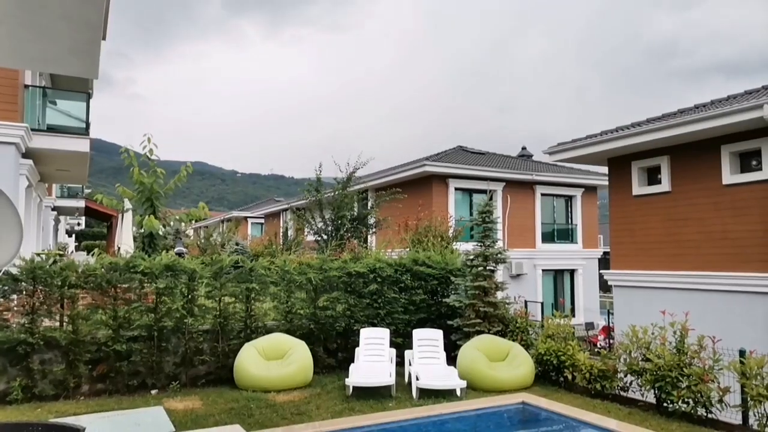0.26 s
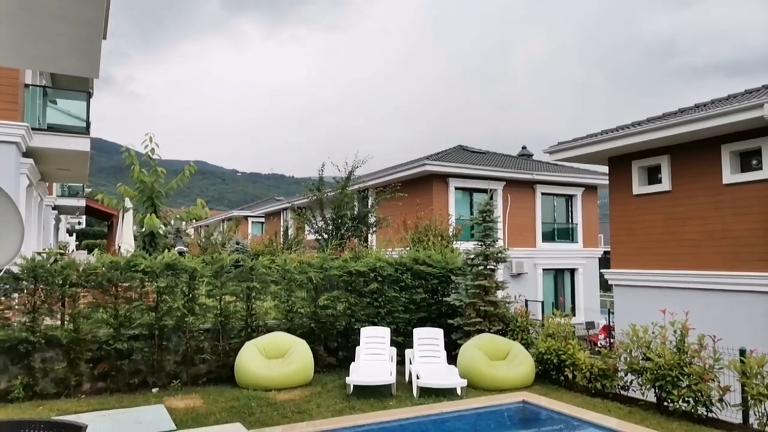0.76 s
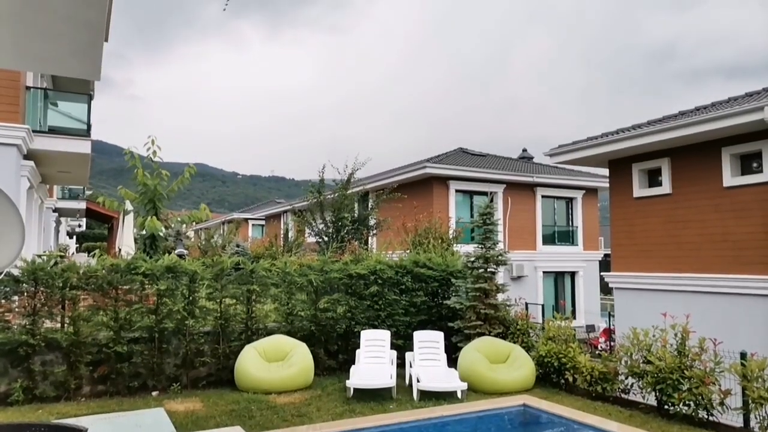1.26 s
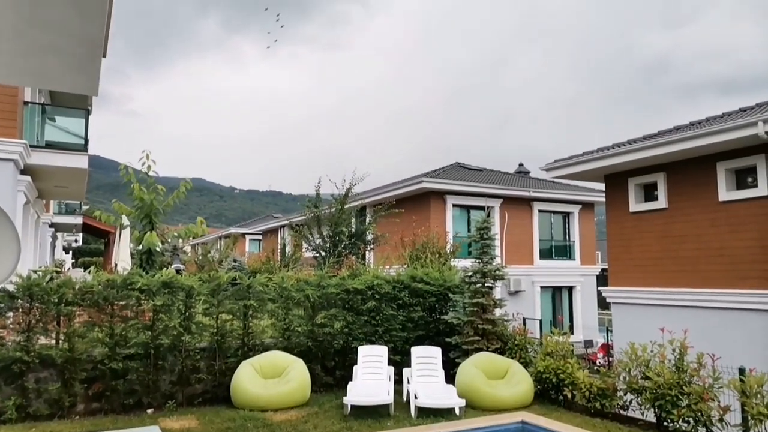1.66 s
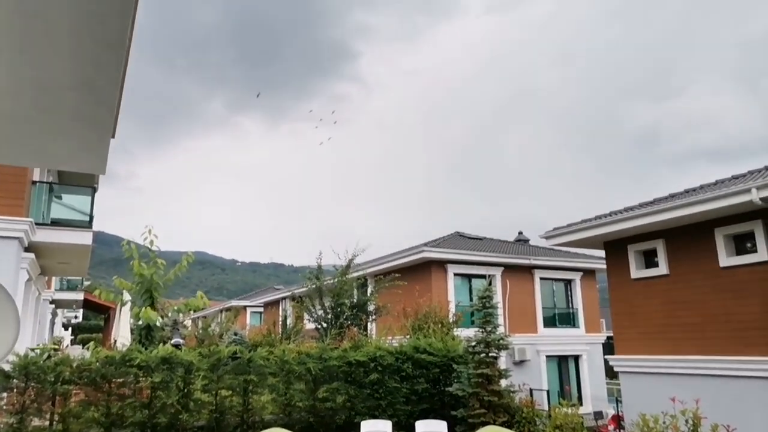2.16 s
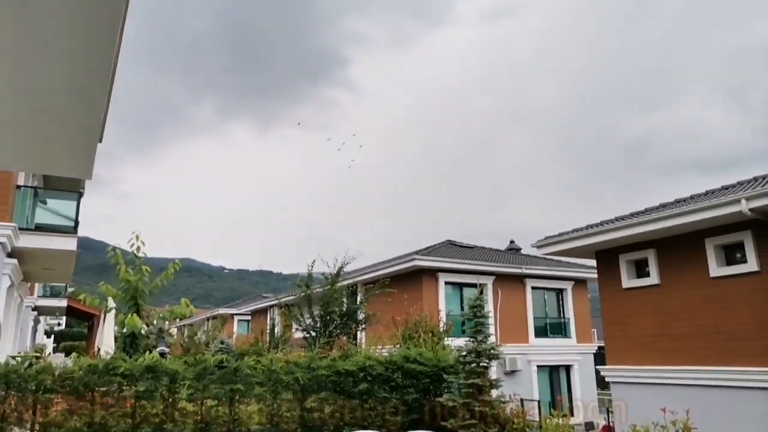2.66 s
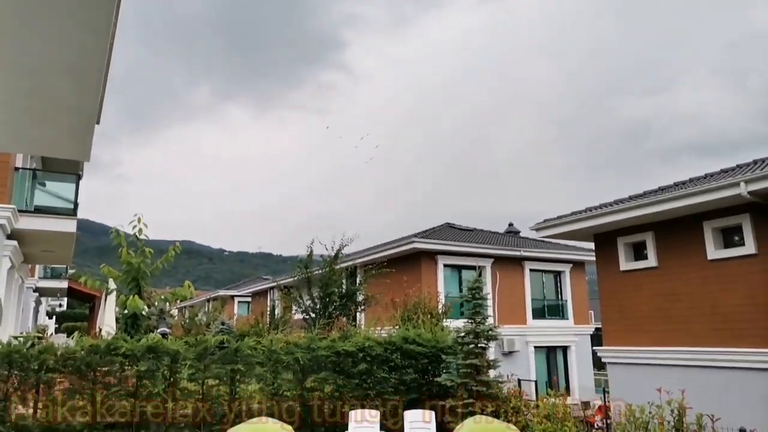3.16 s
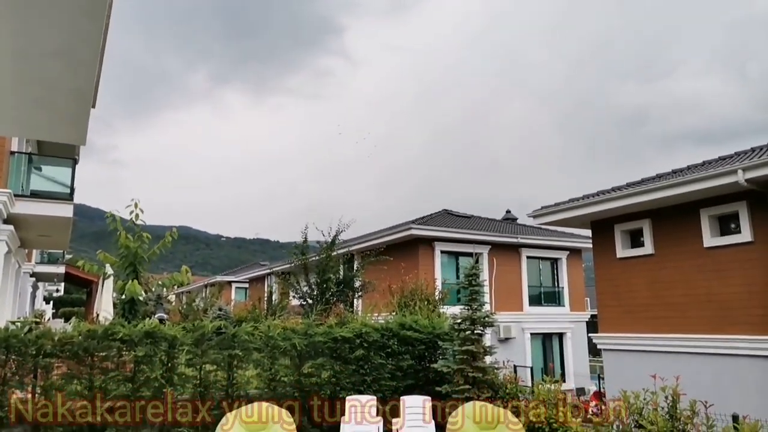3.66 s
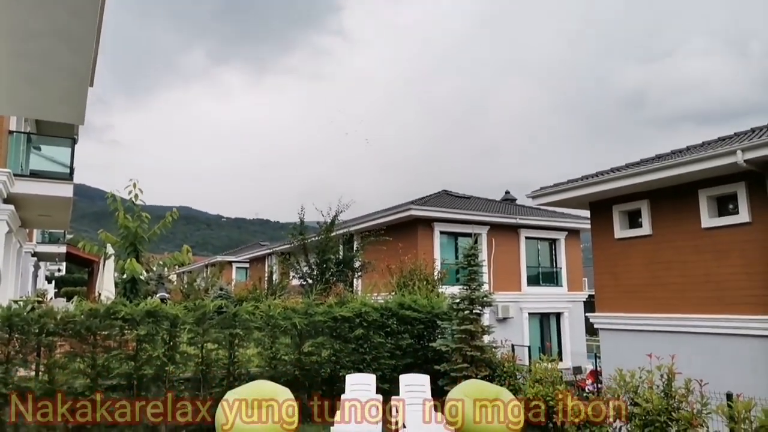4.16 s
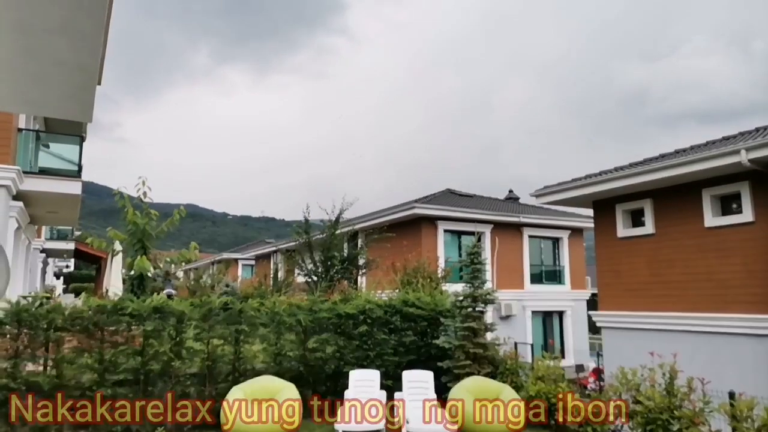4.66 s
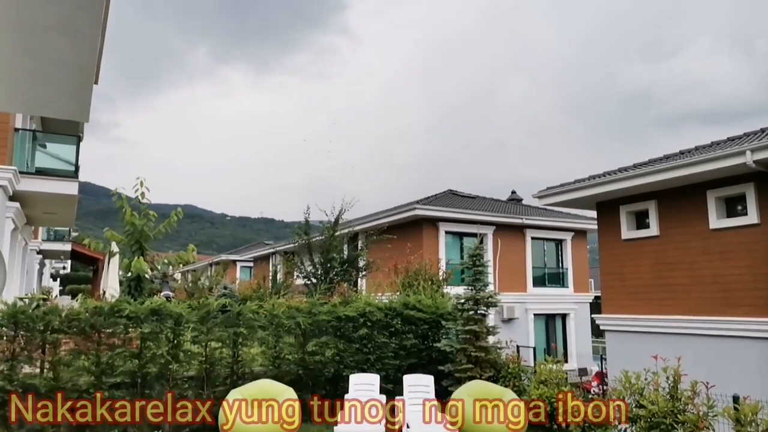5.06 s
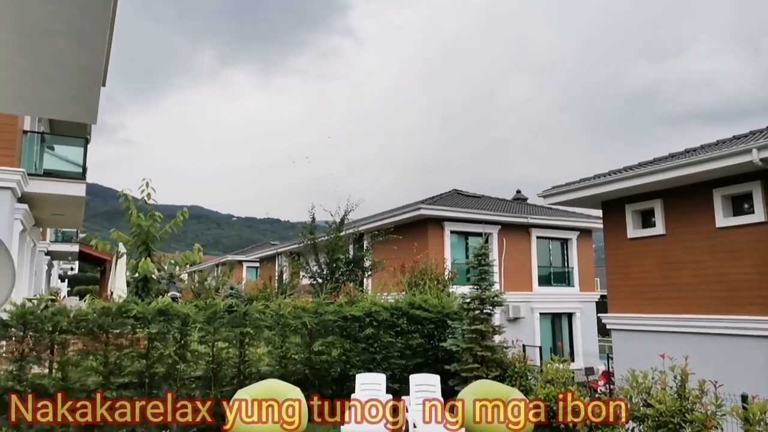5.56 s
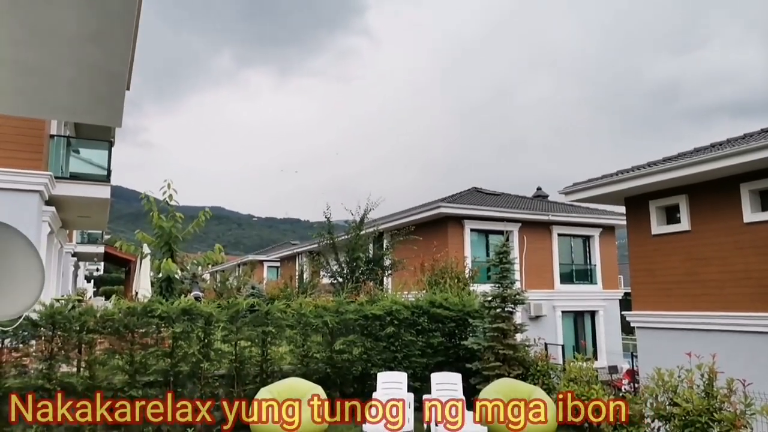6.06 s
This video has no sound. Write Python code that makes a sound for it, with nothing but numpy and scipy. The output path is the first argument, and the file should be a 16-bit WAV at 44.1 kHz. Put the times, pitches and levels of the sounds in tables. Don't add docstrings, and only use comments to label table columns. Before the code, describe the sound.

After a brief silence the sound opens abruptly on a garden between houses. A near sparrow gives three sharp two-note chirps, rests over two seconds while fainter birds answer, then gives three more. Walls return short slap echoes. Beneath lie a low throbbing pump hum, dull town rumble, small breeze puffs and dry leaf ticks. Handheld phone, stereo, slightly hissy.

```python
import sys
import numpy as np
from scipy import signal
from scipy.fft import rfft, irfft, next_fast_len
from scipy.io import wavfile
from scipy.ndimage import uniform_filter1d

SR = 44100
rng = np.random.default_rng(int(sys.argv[2]) if len(sys.argv) > 2 else 0)


def natural_amplitude(level_db):
    exponent = np.asarray(level_db, float) / 20
    return 10 ** exponent


def bounce(signal):
    frames = np.transpose(np.atleast_2d(signal))
    limited = np.clip(frames, -1, 1)
    pcm = np.round(limited * 32767).astype(np.int16)
    wavfile.write(sys.argv[1], SR, pcm)


N = 278271
TIME = np.arange(N) / SR
FFT = next_fast_len(N)
HZ = np.fft.rfftfreq(FFT, 1 / SR)
LEFT_LAG = -16
NEAR_ROUGH, FAR_ROUGH = .03, .06

# time from the note's centre in ms, pitch in Hz,
# level in dB, roughness 0-1.
HOOK_NOTE = [(-30, 3100, -40, 0.33), (-22, 3350, -12, 0.32), (-14, 3550, 2, 0.21), (-9, 3850, 1.5, 0.22),
             (-3, 4420, -2, 0.19), (4, 4550, 0, 0.26), (13.5, 4450, -2, 0.27), (21, 3550, -13, .4),
             (34, 2960, -37, 0.44)]


def on_log(table, hz):
    table = np.array(table)
    return np.interp(np.log(hz + 1), np.log(table[:, 0]), table[:, 1])


def colour(x, table):
    return irfft(rfft(x, FFT) * natural_amplitude(on_log(table, HZ)), FFT)[..., :N]


def unit(x):
    return x / np.sqrt(np.mean(x ** 2))


def walk(rate):
    k = int(SR / rate)
    steps = np.repeat(rng.standard_normal(N // k + 1), k)
    return unit(uniform_filter1d(uniform_filter1d(steps, k), k)[:N])


def loudness(x, ms):
    return np.sqrt(np.abs(uniform_filter1d(x ** 2, int(ms * SR / 1000))))


def wide_noise(table):
    # frequency in Hz, share of power common to both ports.
    likeness = [(60, 0.9), (300, 0.97), (650, 0.88), (1400, 0.36), (3000, 0.13), (15000, 0.022)]
    share = np.clip(on_log(likeness, HZ), 0, 1)
    common, left, right = rfft(rng.standard_normal((3, FFT)))
    delayed = common * np.exp(-2j * np.pi * HZ * LEFT_LAG / SR)
    both = np.array([delayed, common]) * np.sqrt(share)
    apart = np.array([left, right]) * np.sqrt(1 - share)
    return unit(irfft((both + apart) * natural_amplitude(on_log(table, HZ)), FFT)[:, :N])


def duck_db(birds):
    threshold_db, slope, release_s = -36, 0.53, 0.084
    keep = np.exp(-1 / (release_s * SR))
    held = signal.lfilter([1 - keep], [1, -keep], np.mean(birds ** 2, axis=0))
    return -slope * 10 * np.log10(1 + held / natural_amplitude(2 * threshold_db))


def town_level(birds):
    # time in seconds, level in dB.
    carried = [(0.191, -41), (.36, -35.5), (.7, -38.5), (1.0, -37.5), (1.5, -38), (1.72, -43.5),
               (2.1, -44.5), (2.35, -41.5), (2.5, -47.5), (3.2, -48), (3.4, -45), (3.85, -48),
               (4.35, -45.5), (4.86, -44.5), (5.45, -43), (5.66, -46), (6.16, -43), (6.31, -44)]
    return np.interp(TIME, *np.transpose(carried)) + duck_db(birds)


def pump(town_db):
    # frequency in Hz, level in dB per Hz.
    rumble = [(15, -34.5), (28, -7), (50, 0), (102, -9.5), (145, -8.5), (184, -4.5), (209, -7), (244, -8),
              (357, -15.5), (446, -15), (620, -4.5), (690, -10), (830, -11.5), (1100, -22), (1500, -55.5)]
    # frequency in Hz, level in dB against the rumble.
    motor_lines = [(178.2, -13.5), (237, -13), (591.5, -14), (626, -14.5), (550.4, -21.5)]
    throb = 1 + 0.17 * np.sin(2 * np.pi * 59.3 * TIME)
    out = wide_noise(rumble) * throb * natural_amplitude(1.0 * walk(6.006))
    for hz, db in motor_lines:
        swell = natural_amplitude(db + 3.5 + 3.9 * walk(5))
        line = swell * np.sin(2 * np.pi * hz * TIME + 0.65 * walk(7))
        out += np.array([np.roll(line, LEFT_LAG), line])
    port_db = np.array([[-.5], [.4]])
    return natural_amplitude(town_db + 1.6 + 1.0 * walk(12) + port_db) * out


def town_air(town_db):
    # frequency in Hz, level in dB per Hz.
    wash = [(700, -33), (1050, -2), (1500, 1), (2300, -3), (4200, -8.5), (5400, -15.5), (6500, -12.5),
            (8000, -20), (9500, -30), (10500, -36.5), (12400, -37), (13000, -69.5)]
    level_db = -54.5 + .62 * (town_db + 45)
    return natural_amplitude(level_db + 0.82 * walk(8)) * wide_noise(wash)


def gusts():
    # centre in seconds, level in dB, length in seconds.
    puffs = [
        (1.25, -46, .12),
        (1.65, -45, .15),
        (2.2, -44, .12),
        (2.4, -44, .08),
        (2.75, -50, .08),
        (4.25, -50, .1),
        (4.75, -50, .1),
        (5.55, -45, .12),
    ]
    # frequency in Hz, level in dB per Hz.
    buffet = [(20, -8), (50, 0), (120, -6), (240, -8), (400, -24), (800, -50)]
    swell = sum(natural_amplitude(db) * np.exp(-((TIME - s) / length) ** 2) for s, db, length in puffs)
    return swell * unit(colour(rng.standard_normal(N), buffet))


def tick_envelope():
    # start in seconds, peak level in dB.
    leaf_hits = [(0.3985, -50), (0.8495, -58), (1.0306, -50), (1.4376, -53), (1.8068, -51), (2.7756, -59),
                 (2.824, -63), (2.8913, -58), (3.056, -62), (3.695, -51), (4.116, -56), (4.2832, -58),
                 (4.4094, -48), (4.7097, -62), (5.1796, -60), (5.5907, -63)]
    fade_ms = 14
    out = np.zeros(N)
    for s, db in leaf_hits:
        out[int(s * SR)] = natural_amplitude(db - 7)
    out = signal.lfilter([1], [1, -np.exp(-1000 / (fade_ms * SR))], out)
    return uniform_filter1d(out, size=220)


def leaf_ticks(envelope):
    # frequency in Hz, level in dB per Hz.
    rustle = [(5000, -30), (8000, -8), (11000, -6), (12500, -10), (13000, -50)]
    return natural_amplitude(-6) * envelope * unit(colour(rng.standard_normal(N), rustle))


def top_hiss(birds, town_db, envelope):
    # frequency in Hz, level in dB per Hz.
    hiss_band = [(12450, -60), (12780, -3), (13000, 2), (13300, -1.5), (14500, -5), (15700, -2),
                 (16000, -59)]
    # frequency in Hz, weight in dB.
    high_notes = [(3000, -9), (4600, -7), (5600, -1.5), (7000, 5)]
    call_hiss = natural_amplitude(-26) * loudness(colour(birds[0], high_notes), 14)
    floor_db = -74 + .4 * (town_db + 45) + 1.2 * walk(9)
    level = np.sqrt(natural_amplitude(2 * floor_db) + call_hiss ** 2 + envelope ** 2)
    pan_db = np.array([[7.5], [-7.5]]) / 2
    return level * natural_amplitude(pan_db) * wide_noise(hiss_band)


def call_splash(birds):
    # frequency in Hz, level in dB per Hz.
    splash = [(2000, -37), (2500, -4.5), (2950, 11), (4500, 13.5), (5900, 10), (7160, -7), (7750, -1.5),
              (8470, -30), (9160, -8), (9910, -30), (11300, -8.5), (12200, -19), (12800, -48.5)]
    return natural_amplitude(-15) * loudness(birds, 36.0) * wide_noise(splash)


def garden(x, paths, tail_db, rise_ms, lag):
    # frequency in Hz, gain in dB.
    throat = [(1500, -50), (2400, -27), (2900, 0.5), (7000, 0), (12000, 1)]
    # frequency in Hz, gain of the left port against the right in dB.
    left_port = [(2500, -11), (3600, -7), (4500, -2.5), (5200, -3), (5800, 1.5), (8000, -1.5), (12000, 8)]
    tail_t60_s = .58
    ms = np.arange(int(.9 * SR)) / SR * 1000 - 10
    scatter = np.sign(rng.standard_normal((2, len(ms))))
    fade = natural_amplitude(-60 * ms / 1000 / tail_t60_s) * np.clip(ms / rise_ms, 0, 1)
    power = natural_amplitude(2 * tail_db) * fade ** 2 / np.sum(fade ** 2)
    for at, left_db, right_db, smear in paths:
        burst = np.exp(-np.clip(ms - at, 0, None) / (smear + 1e-3)) * (ms >= at)
        power = power + natural_amplitude(2 * np.array([[left_db], [right_db]])) * burst / np.sum(burst)
    voice = colour(x, throat)[None]
    wet = signal.fftconvolve(voice, scatter * np.sqrt(power))
    left, right = wet[:, int(.01 * SR):][:, :N]
    return np.array([colour(np.roll(left, lag), left_port), right])


def sing(shape, calls, second_db, blur=FAR_ROUGH):
    out = np.zeros(N)
    ms, hz, db, rough = np.transpose(shape)
    shake, rasp = walk(700), walk(2200)
    for s, call_db, pitch, length in calls:
        first = int((s + ms[0] * length / 1000) * SR)
        last = int((s + ms[-1] * length / 1000) * SR)
        i = np.arange(first, last)
        at = (i / SR - s) * 1000 / length
        r = np.clip(np.interp(at, ms, rough) + blur, 0, 1)
        glide = uniform_filter1d(np.interp(at, ms, hz), 130) * pitch * (1 + 0.0706 * r * shake[i])
        phase = 2 * np.pi * np.cumsum(glide) / SR
        size = natural_amplitude(call_db + 3.5 + np.interp(at, ms, db)) * (np.sqrt(1 - r ** 2) + r * rasp[i])
        out[i] += size * (np.sin(phase) + natural_amplitude(second_db) * np.sin(2 * phase))
    return out


def far_birds():
    # time from the note's centre in ms, pitch in Hz, level in dB, roughness 0-1.
    step, step_end = [(-41, 3800, -43, 0.23), (-27.5, 3900, -9, .25), (-19.5, 4150, -13, .3),
                      (-10.5, 5200, -9, .3), (-4.5, 6000, -2.5, 0.29), (2.5, 5520, 0, 0.34),
                      (18.5, 5480, -0.5, 0.31), (25.5, 4400, -4, .35), (31, 4000, -37.5, .3)], [(78, 3800, -41.5, .3), (87.5, 3900, -6, 0.34), (98, 4500, 2, 0.33),
                                    (104.6, 5250, -3, .3), (111, 3700, -6, 0.35), (122, 4200, -12, .4),
                                    (128, 3600, -40.5, .2)]
    slur, seep, dip = [(-35, 4000, -39.5, .5), (-18, 4400, -8, 0.5), (0, 4200, 0, 0.32), (16, 4450, 0, .35),
                       (30, 4400, -11, 0.47), (55.5, 4500, -2.5, 0.66), (94, 3700, -39, .5)], [(-20, 6400, -25, 0.72), (-6, 7300, -3, 0.806), (6.5, 7380, 0, 0.802),
                                     (29, 6800, -10, 0.82), (52, 6900, -30, 0.88)], [(-45, 4200, -40, 0.34), (-35, 4100, -8, 0.39),
                                                   (-15, 3800, -4, 0.32), (4.5, 3500, -2, 0.39),
                                                   (29.5, 3350, 0.5, 0.46), (61, 3500, -3.5, 0.43),
                                                   (84, 3400, -38, .4)]
    # centre in seconds, level in dB, pitch factor, length factor.
    step_calls, slur_calls = [(0.343, -43.5, 0.99, 1.01), (0.8116, -45, 0.96, 1.001),
                              (2.075, -43.5, 0.95, 0.98), (2.608, -47, 0.993, 1.001),
                              (3.075, -49, 1, 1.026), (3.615, -52, 1.1, .9), (4.001, -49.5, 1.006, .95),
                              (5.6164, -42, 0.98, 1.015)], [(.195, -41, 0.99, 1.33), (.985, -36.5, 1, 1.33),
                                             (2.1, -40, .92, 1.6), (2.745, -48.5, 1, 0.9),
                                             (2.81, -38, 0.98, 0.97), (3.634, -40, 1.02, 1.3),
                                             (3.711, -46, 1.01, 1.3), (5.6707, -36, 0.98, 0.964)]
    hook_calls, seep_calls, dip_calls = [(2.29, -55, 1.05, 1.03), (5.245, -45, 1.06, 1.3),
                                         (5.531, -55, .87, 1.2), (6.15, -60, 1.04, 1.001),
                                         (2.19, -46, 1.03, 1.2)], [(1.44, -69, 1.1, .5), (1.62, -71, 0.98, .5),
                                                            (2.55, -64, 0.97, 1.5), (2.83, -58, 0.96, 1.6),
                                                            (3.03, -63, 0.91, 1.001),
                                                            (3.59, -53, .95, 0.88), (3.68, -56, 0.96, 1.4),
                                                            (3.95, -61.5, 1.04, 1.3)], [(.19, -44.5, 0.98, 1.07),
                                                                           (1.02, -39, 0.97, 1.2),
                                                                           (2.85, -48, 1.001, 1.001),
                                                                           (3.64, -43, 1.03, 1.6),
                                                                           (3.94, -54.5, 1.02, .8),
                                                                           (4.295, -53, 0.98, .4),
                                                                           (5.70, -48, 1.06, 1.1)]
    # arrival in ms, left level in dB, right level in dB, smear in ms.
    paths = [(0, -3, -1.5, .1), (3.04, -6, -6, 2.2), (20, -6, -8.5, 4), (42.5, -10, -5.5, 9)]
    voices = sing(step, step_calls, -49) + natural_amplitude(-2) * sing(step_end, step_calls, -41)
    voices += sing(slur, slur_calls, -32, -.02)
    voices += sing(HOOK_NOTE, hook_calls, -43)
    voices += sing(seep, seep_calls, -24.5)
    voices += sing(dip, dip_calls, -35, -.02)
    return garden(voices, paths, tail_db=-3, rise_ms=13.0, lag=-10)


def near_bird():
    # time from the note's centre in ms, pitch in Hz, level in dB, roughness 0-1.
    lead, arch = [(-85, 6500, -38, 0.98), (-60, 6400, -22, 1), (-38, 6300, -15.5, 0.96),
                  (-22.5, 5400, -12, 1), (-16, 6400, -42.5, 1)], [(-48, 3700, -29, .6), (-33.5, 3500, -17, .6), (-21.5, 3800, -5, .3),
                                (-13.5, 4900, -0.5, 0.17), (-6, 5750, -1.5, 0.13), (8, 5700, -4, 0.16),
                                (17, 4750, 2, 0.19), (28, 3550, -7.5, .3), (37.5, 3000, -41, .5)]
    # centre in seconds, level in dB, pitch factor, length factor.
    arch_calls = [
        (.510, -21, 0.99, 1.03),
        (1.106, -23, 0.98, 1.01),
        (1.858, -21.5, 0.99, 1.02),
        (4.488, -23, 0.984, 1.03),
        (4.9543, -22, 1.001, 1.001),
        (5.738, -22, 0.98, 0.972),
    ]
    hook_calls = [
        (.605, -23, 1.021, 0.96),
        (1.197, -22.5, 1.01, 0.96),
        (1.956, -23, 0.98, 1),
        (4.5805, -24, 0.96, 1.045),
        (5.0493, -23.5, 1.001, 1.001),
        (5.834, -23, 1.004, 0.99),
    ]
    # arrival in ms, left level in dB, right level in dB, smear in ms.
    paths = [(-8, -2, -9.5, 0.05), (-5, -7, -13.5, 4), (0, -14, -1.5, 0), (0.87, -13.5, -5, .6),
             (4, -8, -12, 0.5), (12.5, -18, -17.5, 4), (56.5, -15.5, -21, 2.5), (66.5, -8, -6.5, .04),
             (127.5, -25, -20.5, 7)]
    voice = sing(lead, arch_calls, -27)
    voice += sing(arch, arch_calls, -32, NEAR_ROUGH)
    voice += sing(HOOK_NOTE, hook_calls, -37.5, NEAR_ROUGH)
    return garden(voice, paths, tail_db=-6.5, rise_ms=10.0, lag=-17)


def scene():
    birds = far_birds() + near_bird()
    town_db = town_level(birds)
    envelope = tick_envelope()
    background = pump(town_db) + town_air(town_db) + gusts() + leaf_ticks(envelope)
    return background + top_hiss(birds, town_db, envelope) + call_splash(birds) + birds


def top_cut(x):
    return signal.sosfilt(signal.butter(12, 15790, fs=SR, output="sos"), x)


def record(dry):
    start_s, opening_s = .183, 0.00052
    opened = np.clip((TIME - start_s) / opening_s, 0, 1)
    return top_cut(dry * opened)


dry = scene()
out = record(dry)
bounce(out)
```